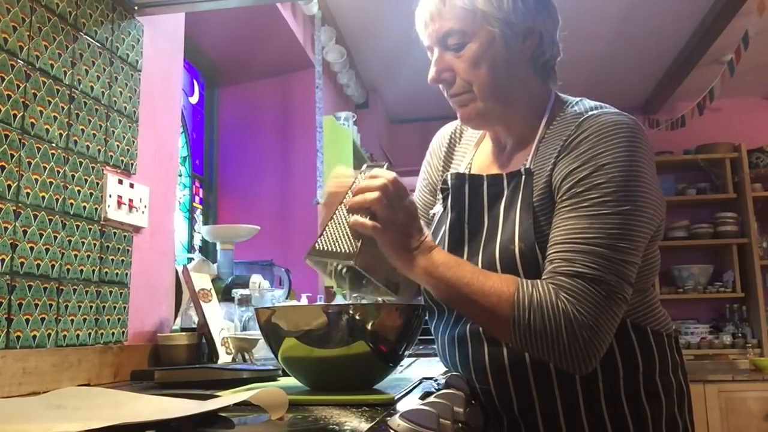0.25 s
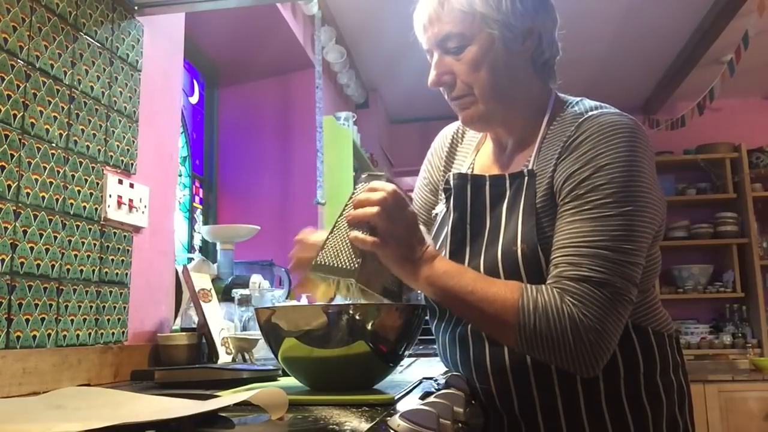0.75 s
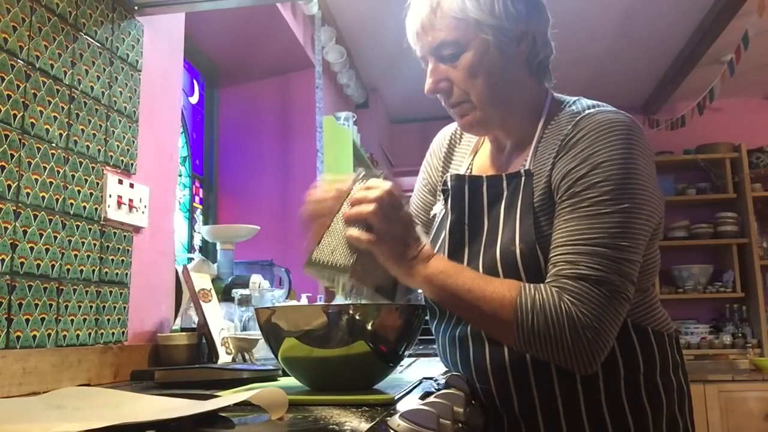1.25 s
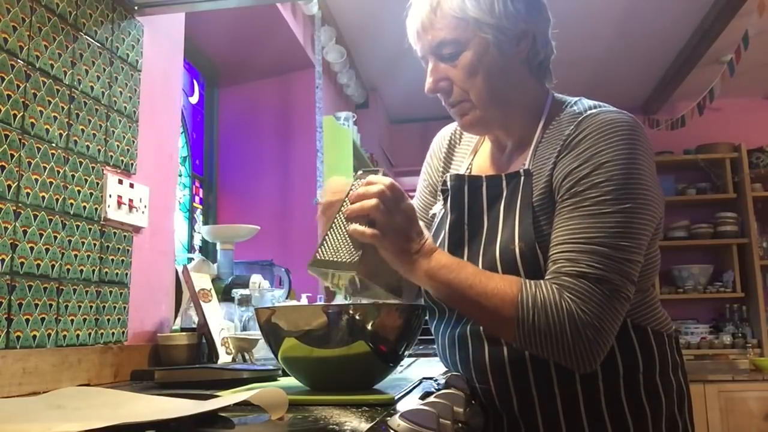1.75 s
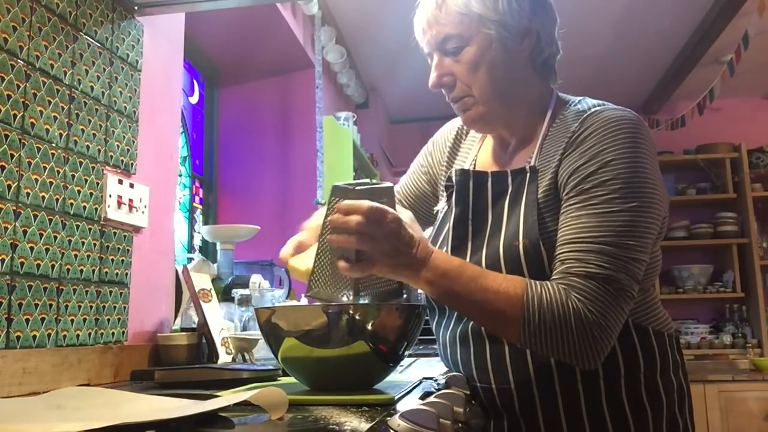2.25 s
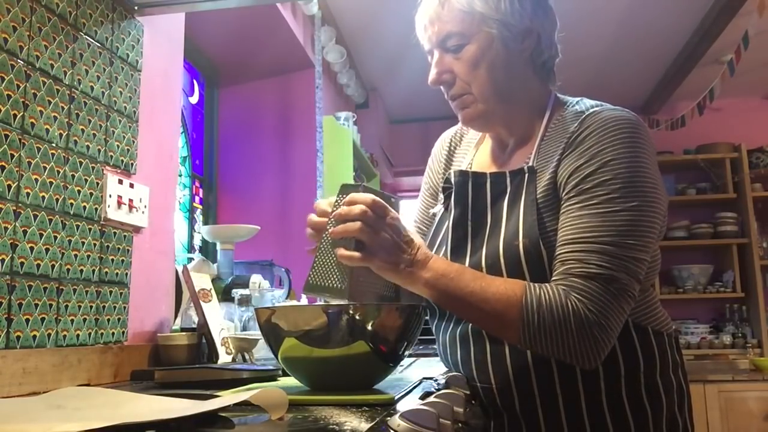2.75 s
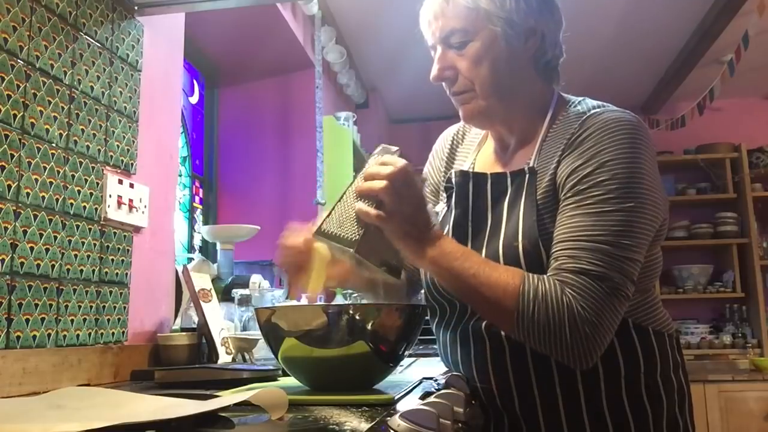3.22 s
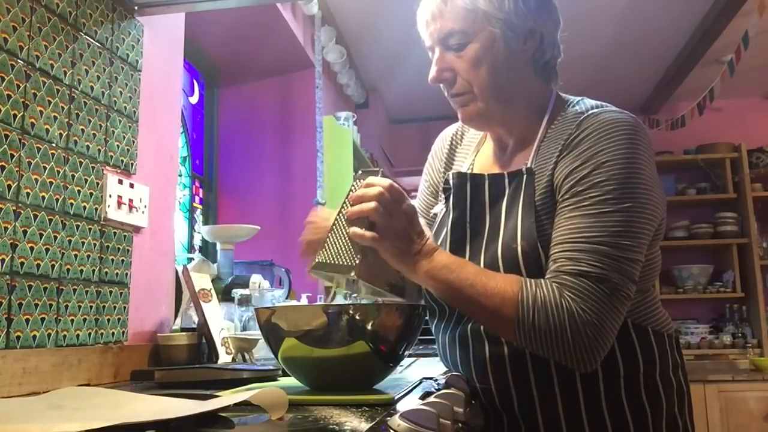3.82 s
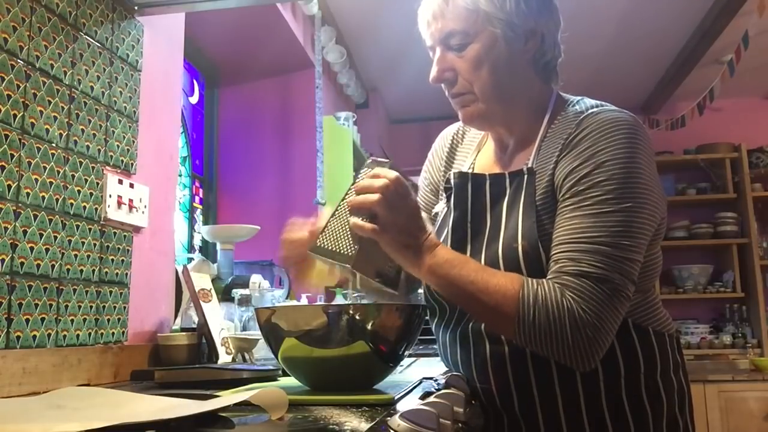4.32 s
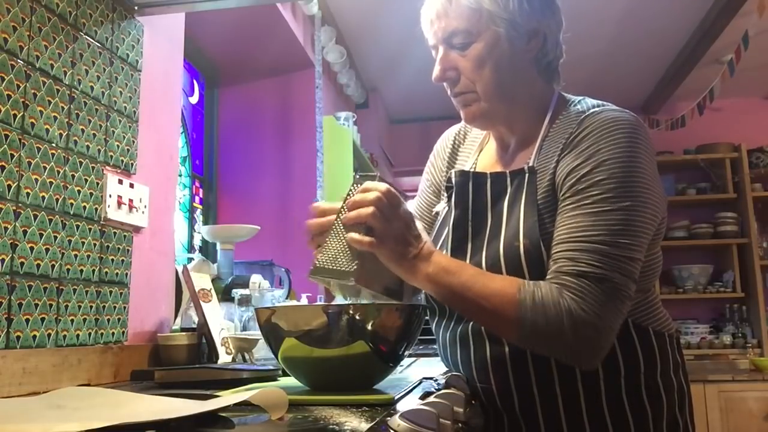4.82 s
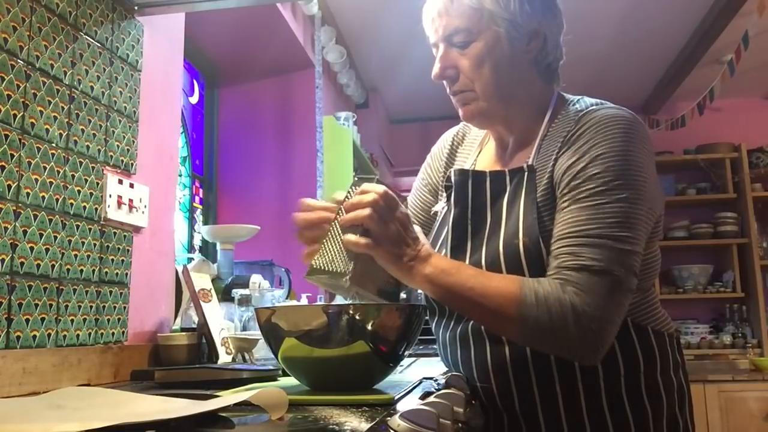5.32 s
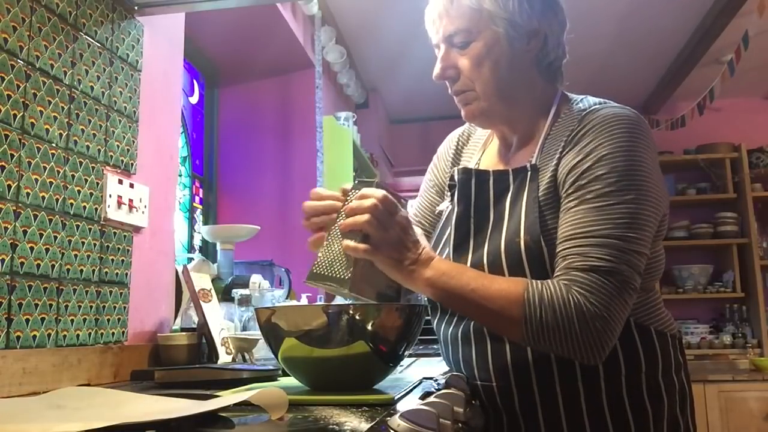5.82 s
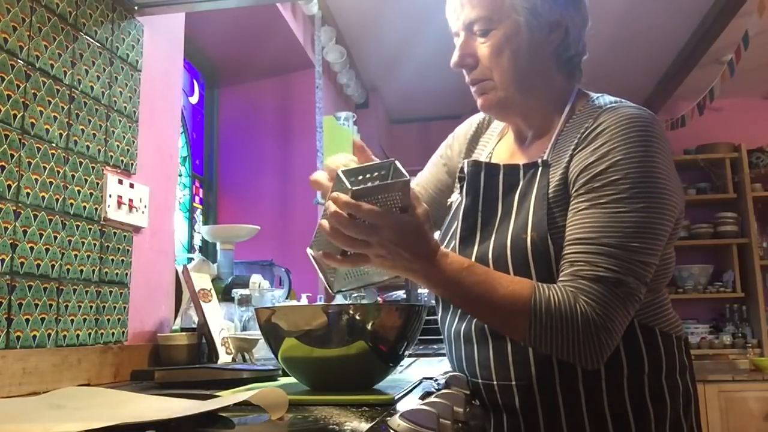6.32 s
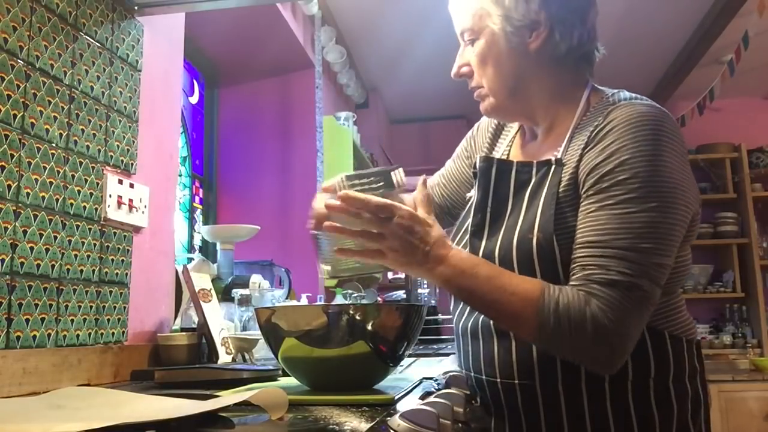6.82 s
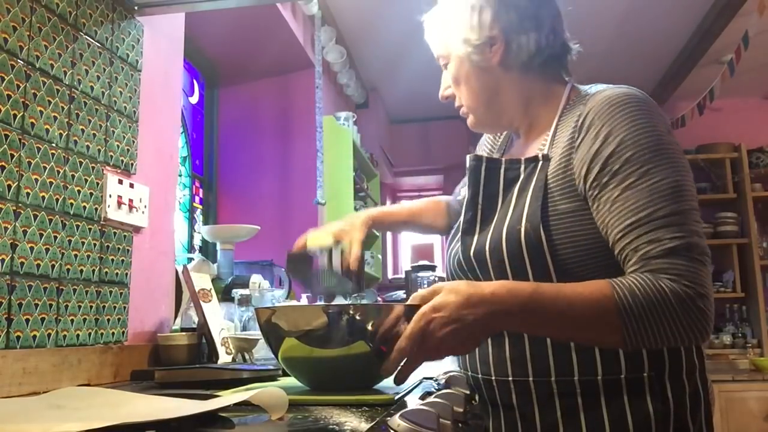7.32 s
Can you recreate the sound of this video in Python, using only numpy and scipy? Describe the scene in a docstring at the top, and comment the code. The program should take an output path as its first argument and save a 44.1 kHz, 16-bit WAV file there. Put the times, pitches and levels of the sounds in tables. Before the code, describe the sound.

In a small, lively kitchen, cheese is grated in short, uneven, quiet rasps on a hollow metal grater, with soft thumps, light tinny ticks and barely audible squeaks. After a short lull, a row of hard, evenly spaced knocks makes the loose sheet steel clash, the last sharpest and brightest. A light rub and a small tick follow. The microphone is fairly close, over a very faint low hum.

```python
"""Cheese rasps in short strokes over a steel grater, with soft bumps, light ticks and thin squeaks; hard
knocks then clash its loose sheet metal, and fingers rub it at the end, in a small, faintly humming kitchen.
Rubbing is a stream of tiny random slips that fizz and drive ringing walls; knocks and bumps are damped
swings with bursts of coloured noise for the steel; squeaks are wavering sines. Noise reflections make
the room, shaped noise its air, and unsteady tones its hum."""
import sys
import numpy as np
from scipy import signal
from scipy.fft import rfft, irfft, next_fast_len
from scipy.io import wavfile

SR = 44100
rng = np.random.default_rng(int(sys.argv[2]) if len(sys.argv) > 2 else 0)


def wav_record(signal):
    """Record a signal, one row per channel, as 16-bit PCM in the file named by sys.argv[1]."""
    frames = np.transpose(np.atleast_2d(signal))
    bounded = np.clip(frames, -1, 1)
    # unit amplitude maps onto the largest positive 16-bit level
    quanta = np.round(bounded * 32767).astype(np.int16)
    wavfile.write(sys.argv[1], SR, quanta)


N = 333837  # length in samples
RING_T = np.arange(SR // 3) / SR  # time axis of every metal sound, in seconds

# Colour of the still room. Each row: frequency in Hz, relative level in dB.
AIR_COLOUR = [(22, -57), (31, -28), (45, -16), (62, -10.5), (85, -11), (135, -8.5), (260, -17.5),
              (400, -24), (550, -27), (700, -27), (1020, -32), (1900, -32.5), (2760, -38.5), (14000, -44.5),
              (16000, -56)]
AIR_DB = -64
# The low hum. Each row: frequency in Hz, level in dB, share of wavering.
HUM_TONES = [(100.3, -63, 0.17), (145, -70, 0.94), (207, -79, 0.92), (249.7, -77.5, 0.46)]
# The kitchen's decay. Each row: frequency in Hz, time to fall 60 dB in seconds.
KITCHEN_DECAY = [(150, 0.56), (600, 0.19), (2000, 0.33), (5000, 0.3), (10000, 0.31), (15000, 0.25)]
TURN_S = 0.33  # time after which a new set of reflections starts to fade in

# Ringing of the grater's walls. Each row: frequency in Hz, relative level in dB,
# time to fall 60 dB in seconds.
WALL_MODES = [(274, -14, 0.22), (392.8, -7.5, 0.27), (465, -7.5, .08), (541.5, -10.5, 0.099),
              (670.3, 4, 0.085), (1056, -5, .1), (1082, -4, 0.039), (1246, -7, 0.046), (1340, -8.5, .1),
              (1498, -15.5, 0.1), (2000, -6, 0.025), (2410, -11.5, 0.029), (2770, -16.5, .06),
              (2873, -10.5, 0.097)]
# High ringing of the thin perforated sheet. Each row: frequency in Hz, relative level in dB.
SHEET_MODES = [(2810, -7), (3290, -5), (3740, -6), (5694, -5), (6660, -4), (6884, -5), (8312, -2),
               (8540, 1), (9066, -4), (9330, -3), (10349, -4), (11383, -2), (12220, -1), (12430, 1),
               (12604, 0)]
SHEET_T60_S, SHEET_DB = 0.08, -11  # decay; level relative to the sizzle

# Colours of the metal and the rubbing. Each row of these seven: frequency in Hz, relative level in dB.
# The shudder of the bending panel:
PANEL_COLOUR = [(80, -33.5), (190, -12), (260, -4.5), (350, -1), (620, 1.5), (740, -7.5), (860, -14.5),
                (1300, -18), (2500, -45), (6000, -60.5)]
# The clank of the steel:
CLANK_COLOUR = [(80, -35.5), (170, -5.5), (260, 2), (400, 5), (850, 1), (1300, 8), (1750, 1.5), (2050, 1),
                (2450, 1), (3600, 3.5), (5000, -10), (8000, -9), (16000, -39)]
# The lighter clank of a tick:
TINK_COLOUR = [(200, 4), (700, -5.5), (1500, -9.5), (2000, -4), (2700, -3), (3400, -6), (5000, -10.5),
               (8000, -25), (16000, -52)]
# The bright sizzle of the steel:
SIZZLE_COLOUR = [(800, -36.5), (2300, -8), (2900, -6), (3600, -1), (4300, -2), (5500, 0), (7700, -3.5),
                 (8500, 1.5), (9800, -2), (12300, 2), (14500, -1), (16000, -18)]
# The tiny teeth, ringing near the top of hearing:
TINES_COLOUR = [(5000, -28), (10000, -8.5), (12000, 1), (13000, -1), (14300, 5), (16000, -18)]
# The scrape of rubbing:
RASP_COLOUR = [(200, -22.5), (550, 6.5), (850, -16.5), (1200, 1.5), (2000, -10.5), (3200, -2), (5000, -8.5),
               (10000, -29)]
# The fizz of the cutting edges:
FIZZ_COLOUR = [(1500, -14.5), (4000, -5), (7000, -8), (8600, 0), (10500, -5), (13000, 0), (16000, -20)]

# Light metal ticks as the grater shifts in the hand. Each row: start in seconds, sizzle in dB,
# clank in dB, ring of the teeth in dB, time to fall 60 dB in seconds.
TICK_EVENTS = [(0.488, -80, -90, -72, 0.049), (0.694, -63.5, -77, -63, 0.051),
               (0.8789, -64, -63, -83, .045), (1.663, -74, -51.5, -58.5, 0.056),
               (2.0858, -48, -79, -46, 0.038), (2.198, -71, -57.5, -90, 0.068),
               (2.229, -69.5, -68, -88, 0.02), (3.203, -74, -84, -70, .036), (3.3397, -72, -83, -67, .035),
               (3.4263, -77, -66.5, -85, 0.032), (3.455, -61, -69, -86, 0.052),
               (4.2852, -67, -68, -89, 0.049), (4.57, -49.5, -62, -81, .075),
               (6.3589, -70, -64, -80, 0.093), (7.3245, -63, -53, -86, 0.071)]
# Soft bumps as the cheese lands on the grater or the grater settles in the hand.
# Each row: start in seconds, thud in dB, thud pitch in Hz.
BUMP_EVENTS = [(0.12, -63, 490), (0.296, -59.5, 485), (0.655, -53.5, 557), (1.013, -55, 603),
               (1.23, -56.5, 620), (1.392, -54, 484), (1.787, -51, 512), (2.198, -59.5, 647),
               (2.743, -62, 590), (3.012, -61.5, 664), (3.423, -52.5, 410), (3.763, -57, 530),
               (3.967, -64, 685), (4.121, -52.5, 528), (4.541, -62.5, 530), (5.904, -57.5, 460),
               (6.489, -59, 450), (6.558, -63, 562)]
BUMP_CLANK_DB = -21.5  # relative to the thud
REBOUND_S, REBOUND_DB = 0.023, -14  # delay of the weaker second bump; level relative to the first
# Hard knocks on the grater. Each row: start in seconds, sizzle in dB, thud pitch in Hz, thud in dB,
# clank in dB, clash decay over 60 dB in seconds, clank tilt in dB per octave,
# shudder in dB relative to the panel's swing.
KNOCK_EVENTS = [(4.9209, -36, 663, -32, -38, 0.063, 1.5, 1), (5.077, -57, 623, -40.5, -51, 0.065, -1.5, -3),
                (5.2377, -55, 536, -41.5, -46.5, 0.082, -4.5, -12.5),
                (5.396, -53, 510, -42.5, -47, 0.082, -4, 19),
                (5.5568, -48.5, 593, -38, -39.5, 0.058, -4, 6),
                (5.8656, -45.5, 605, -33, -36.5, 0.07, -7, -5),
                (6.1423, -21.5, 632, -29.5, -32.5, 0.041, 3.5, -13),
                (6.238, -60, 412, -63, -50, 0.1, 0.5, -5), (6.4599, -54.5, 520, -55, -49.5, 0.12, 2, 31)]
CONTACT_HZ = 600  # above this the hardness of a knock tilts its clank

# Squeaks as cheese and fingers drag on the steel. Each row: start in seconds, length in seconds,
# pitch at full pressure in Hz, level at full pressure in dB.
SQUEAK_EVENTS = [(2.865, 0.27, 2630, -80.5), (3.1, 0.11, 2740, -78), (3.207, 0.16, 2580, -73),
                 (3.557, .12, 2610, -81), (6.861, 0.072, 1825, -73)]
SQUEAK_ARCH = 0.029  # share by which the pitch sags when the pressure is low
# The cheese, and at the end the fingers, sliding over the teeth. Each row: start in seconds,
# length in seconds, drive of the walls' rasp in dB, fizz of the cutting edges in dB.
STROKE_EVENTS = [(0.0, 0.045, -69.5, -72), (0.082, 0.089, -66, -69.5), (0.288, 0.074, -66, -73),
                 (0.375, 0.074, -61, -68.5), (0.464, 0.08, -68.5, -76), (0.731, 0.081, -61, -73),
                 (0.834, 0.089, -71, -76), (1.08, 0.12, -88, -76), (1.193, 0.1, -59.5, -66.5),
                 (1.473, 0.13, -71.5, -78), (1.68, 0.37, -77, -84), (1.98, 0.065, -61.5, -64.5),
                 (2.162, 0.12, -62.5, -89), (2.847, 0.13, -89, -73), (3.083, 0.32, -69, -72.5),
                 (3.534, 0.14, -67.5, -77), (3.847, 0.051, -72, -77), (3.93, 0.077, -67.5, -76.5),
                 (4.19, 0.11, -70.5, -75), (4.34, 0.06, -63.5, -75.5), (4.608, 0.074, -60, -67),
                 (4.691, 0.084, -65.5, -78), (6.857, .06, -72, -68.5), (6.956, .08, -85, -78.5)]
BITE_SHARE, RELEASE_SHARE = 0.27, 0.42  # parts of a stroke in which the pressure builds and lets go
# Between strokes the cheese still drags lightly on the steel: end, fade before it, drive.
DRAG_END_S, DRAG_FADE_S, DRAG_DB = 4.5, 0.065, -80.5

LOW_CUT_HZ, EDGE_HZ = 24, 15800  # the microphone's low cut and the upper band limit


def amp(db):
    """Decibels to gain."""
    return 10 ** (np.asarray(db) / 20)


def unit(x):
    """Scales to rms 1."""
    return x / np.sqrt(np.mean(x ** 2) + 1e-20)


def struck(x):
    """Scales a blow to rms 1 over its first hundredth of a second."""
    return x / np.sqrt(np.mean(x[:441] ** 2) + 1e-20)


def fading(t, t60):
    """Exponential decay that falls 60 dB in t60 seconds."""
    return np.exp(-np.log(1000) * t / t60)


def read(points, hz):
    """Reads a table along a log-frequency axis."""
    f, value = np.transpose(points)
    return np.interp(np.log(hz + 1), np.log(f + 1), value)


def add(mix, s, sound):
    """Mixes a sound in at time s."""
    part = mix[max(round(s * SR), 0):][:len(sound)]
    part += sound[:len(part)]


def colour(x, points, size=4096):
    """Causal, minimum-phase filter with the given spectrum."""
    log_gain = np.log(amp(read(points, abs(np.fft.fftfreq(size, 1 / SR)))))
    taps = np.fft.ifft(np.exp(np.conj(signal.hilbert(log_gain)))).real
    return signal.fftconvolve(x, taps[:size // 2])[:len(x)]


def drift(rate):
    """Smooth random wander of rms 1, changing up to about rate times a second."""
    size = next_fast_len(N)
    hz = np.fft.rfftfreq(size, 1 / SR)
    spectrum = rfft(rng.standard_normal(size)) * np.exp(-(hz / rate) ** 2)
    return unit(irfft(spectrum, size)[:N])


def background():
    """Still air is shaped noise; each hum tone wavers in level and phase."""
    t = np.arange(N) / SR
    air_gain = amp(read(AIR_COLOUR, np.fft.rfftfreq(N, 1 / SR)))
    air = irfft(rfft(rng.standard_normal(N)) * air_gain, N)
    out = amp(AIR_DB) * unit(air)
    for hz, db, waver in HUM_TONES:
        sway = 1 + waver * (drift(rate=17) + 1j * drift(rate=6.0))
        out += amp(db) * unit((sway * np.exp(2j * np.pi * hz * t)).real)
    return out


def kitchen(x, wet_db, build, count=5):
    """Dense reflections off tiles and worktop, each band dying at its own speed; every so often a new set fades
    in as the old one fades out."""
    t = np.arange(SR // 2) / SR
    out = x.copy()
    for k in range(count):
        taps = rng.standard_normal(len(t)) * (1 - np.exp(-(t / build) ** 2))
        hz, at, bands = signal.stft(taps, SR, nperseg=256)
        bands = bands * fading(at, read(KITCHEN_DECAY, hz)[:, None])
        tail = signal.istft(bands, SR, nperseg=256)[1]
        # the sets of reflections take turns, each fading in as the one before fades out
        turn = (np.arange(N) / SR / TURN_S - k) % count
        share = np.sin(np.pi / 2 * np.minimum(turn, 2))
        out += amp(wet_db) * signal.oaconvolve(x * share, tail / np.linalg.norm(tail))[:N]
    return out


def walls(spread_db):
    """The walls ring as decaying sines; each place of contact weights the modes differently."""
    hz, db, t60 = np.transpose(WALL_MODES)[:, :, None]
    weight = amp(db + spread_db * rng.standard_normal(hz.shape))
    modes = weight * fading(RING_T, t60) * np.sin(2 * np.pi * hz * RING_T)
    return modes.sum(0)


def sheet(spread_db):
    """The perforated sheet's own high notes decay together; each contact weights them differently."""
    hz, db = np.transpose(SHEET_MODES)[:, :, None]
    weight = amp(db + spread_db * rng.standard_normal(hz.shape))
    phase = rng.random(hz.shape)
    notes = (weight * np.sin(2 * np.pi * (hz * RING_T + phase))).sum(0)
    return struck(notes * fading(RING_T, SHEET_T60_S))


def clash(points, t60, rise):
    """Crowded modes of thin steel, as coloured noise quickly damped by the hand."""
    envelope = fading(RING_T, t60) * (1 - np.exp(-RING_T / rise))
    return struck(colour(rng.standard_normal(len(RING_T)) * envelope, points))


def thud(hz, swell, ring_db, rough_db):
    """The hand-damped panel swings a few cycles, shudders, and leaves the walls ringing."""
    u = RING_T / swell
    swing = struck(u * np.exp(-u) * np.sin(2 * np.pi * hz * RING_T))
    shudder = amp(rough_db) * clash(PANEL_COLOUR, t60=0.066, rise=0.0013)
    ringing = amp(ring_db) * struck(walls(spread_db=4.0))
    return struck(swing + shudder + ringing)


def rattle(points, fade, count=4):
    """The loose grater chatters a few times after a knock, ever more weakly."""
    out = np.zeros(len(RING_T))
    for chance in rng.random(count):
        delay = 0.015 + 0.056 * chance
        add(out, delay, np.exp(-delay / fade) * clash(points, t60=0.038, rise=0.0008))
    return out


def ticks():
    """Light contacts excite the sizzle, the sheet, a thin clank and the teeth, without a thud."""
    out = np.zeros(N)
    for s, sizzle_db, clank_db, tines_db, t60 in TICK_EVENTS:
        add(out, s, amp(sizzle_db) * clash(SIZZLE_COLOUR, t60, rise=0.0018))
        add(out, s, amp(sizzle_db + SHEET_DB) * sheet(spread_db=1.5))
        add(out, s, amp(clank_db) * clash(TINK_COLOUR, t60, rise=0.0013))
        add(out, s, amp(tines_db) * clash(TINES_COLOUR, t60, rise=0.00082))
    return out


def bumps():
    """Something soft meets the grater, thuds and rebounds once."""
    out = np.zeros(N)
    for s, thud_db, hz in BUMP_EVENTS:
        first = thud(hz, swell=0.003, ring_db=-12.5, rough_db=-1.5)
        rebound = thud(hz, swell=0.0047, ring_db=-15.5, rough_db=-1.0)
        add(out, s, amp(thud_db) * first)
        add(out, s + REBOUND_S, amp(thud_db + REBOUND_DB) * rebound)
        add(out, s, amp(thud_db + BUMP_CLANK_DB) * clash(CLANK_COLOUR, t60=0.089, rise=0.0019))
    return out


def knocks(brush_db=-20, brush_s=0.0086, rattle_db=-13):
    """The hand brushes the steel, then the knock bends the panel and makes the sheets clash."""
    out = np.zeros(N)
    lead = np.arange(SR // 30) / SR
    swell_in = np.exp(-lead[::-1] / brush_s)  # the brush grows towards the knock
    for s, sizzle_db, hz, thud_db, clank_db, t60, tilt, shudder_db in KNOCK_EVENTS:
        # a softer contact is duller
        steel = [(f, db + tilt * np.log2(max(f, CONTACT_HZ) / CONTACT_HZ)) for f, db in CLANK_COLOUR]
        brush = unit(colour(rng.standard_normal(len(lead)), steel)) * swell_in
        add(out, s - lead[-1], amp(clank_db + brush_db) * brush)
        add(out, s, amp(thud_db) * thud(hz, swell=0.0029, ring_db=-4.0, rough_db=shudder_db))
        add(out, s, amp(clank_db) * clash(steel, t60, rise=0.0018))
        add(out, s, amp(clank_db + rattle_db) * rattle(steel, fade=0.058))
        add(out, s, amp(sizzle_db) * clash(SIZZLE_COLOUR, t60, rise=0.013))
        add(out, s, amp(sizzle_db + SHEET_DB) * sheet(spread_db=0.5))
    return out


def pressure(t, start, length):
    """The hand presses in, holds and lets go: 0 to 1."""
    u = (t - start) / length
    return np.clip(np.minimum(u / BITE_SHARE, (1 - u) / RELEASE_SHARE), 0, 1)


def squeaks(wander):
    """Sticking and slipping makes a thin, rough note that rises a little with the pressure."""
    t, out = np.arange(N) / SR, np.zeros(N)
    jitter = 1 + wander * drift(rate=364)
    for start, length, hz, db in SQUEAK_EVENTS:
        press = pressure(t, start, length)
        pitch = hz * (1 - SQUEAK_ARCH * (1 - press)) * jitter
        turns = np.cumsum(pitch) / SR
        out += amp(db) * press * unit(np.sin(2 * np.pi * turns))
    return out


def teeth(per_s, size_db, clump_db):
    """Tiny slips of uneven size, swelling in clumps as rows of teeth bite."""
    slips = (rng.random(N) < per_s / SR) * rng.choice([-1, 1], N)
    size = size_db * np.minimum(rng.exponential(1, N), 4)
    return slips * amp(size + clump_db * drift(rate=21))


def grating(travel_db=2.0, scrape_db=-4.5, ring_db=-7):
    """Slips on the teeth fizz at the edges and set the walls ringing, as hard as the hand presses."""
    t = np.arange(N) / SR
    rasp = amp(DRAG_DB) * np.clip((DRAG_END_S - t) / DRAG_FADE_S, 0, 1)
    fizz = np.zeros(N)
    for start, length, rasp_db, fizz_db in STROKE_EVENTS:
        press = pressure(t, start, length)
        rasp = np.hypot(rasp, amp(rasp_db) * press)
        fizz += amp(fizz_db) * press
    slips = unit(teeth(per_s=800, size_db=2.0, clump_db=5.5))
    ringing = np.zeros(N)
    for hz, db, t60 in WALL_MODES:  # the moving cheese drives now one mode, now another
        mode = fading(RING_T, t60) * np.sin(2 * np.pi * hz * RING_T)
        drive = rasp * slips * amp(db + travel_db * drift(rate=33))
        ringing += signal.oaconvolve(drive, mode / np.linalg.norm(mode))[:N]
    scrape = rasp * unit(colour(slips, RASP_COLOUR))
    edges = fizz * unit(colour(slips, FIZZ_COLOUR))
    return amp(scrape_db) * scrape + amp(ring_db) * ringing + edges


def scene():
    """All contacts sound in the same small room, over its air and hum."""
    grater = ticks() + bumps() + knocks() + squeaks(wander=0.0495) + grating()
    return (kitchen(grater, wet_db=-7.5, build=0.0008) + background())[None]


def record(dry):
    """The microphone's low cut, then a steep upper band limit."""
    low_cut = signal.butter(2, LOW_CUT_HZ, "highpass", fs=SR, output="sos")
    thin = signal.sosfilt(low_cut, dry)
    band_limit = signal.firwin(255, EDGE_HZ, window=("kaiser", 8), fs=SR)
    return signal.oaconvolve(thin, band_limit[None], "same")


dry = scene()
out = record(dry)
wav_record(out)
```